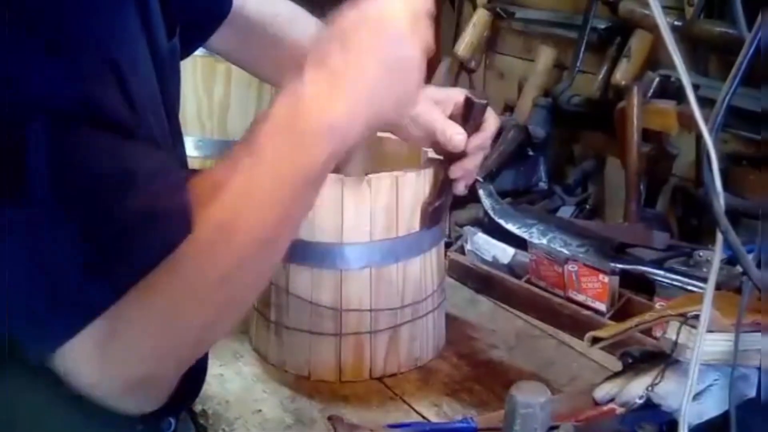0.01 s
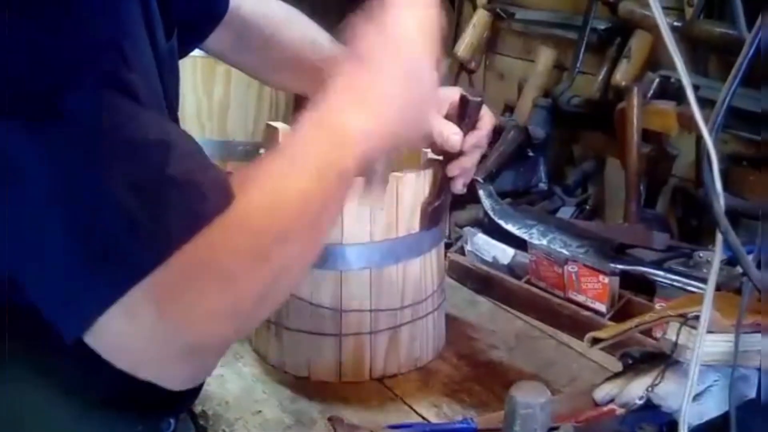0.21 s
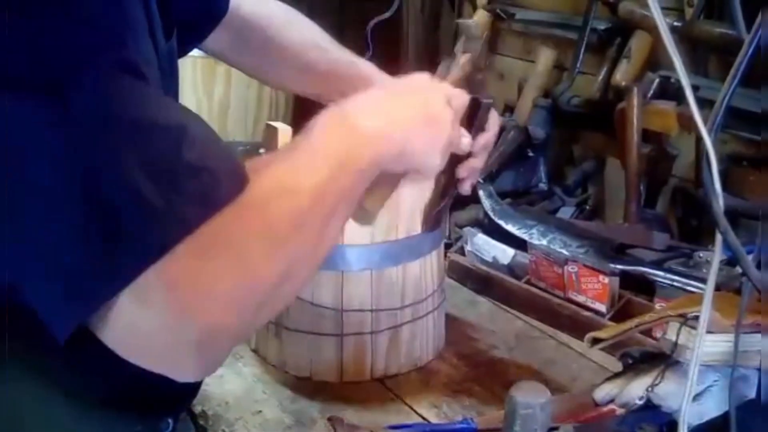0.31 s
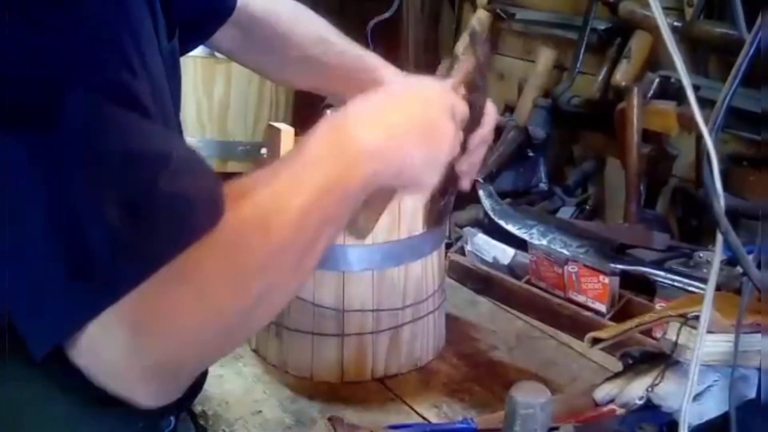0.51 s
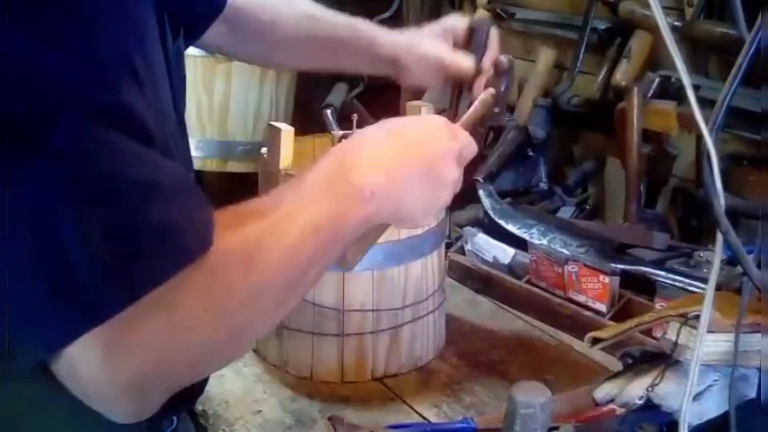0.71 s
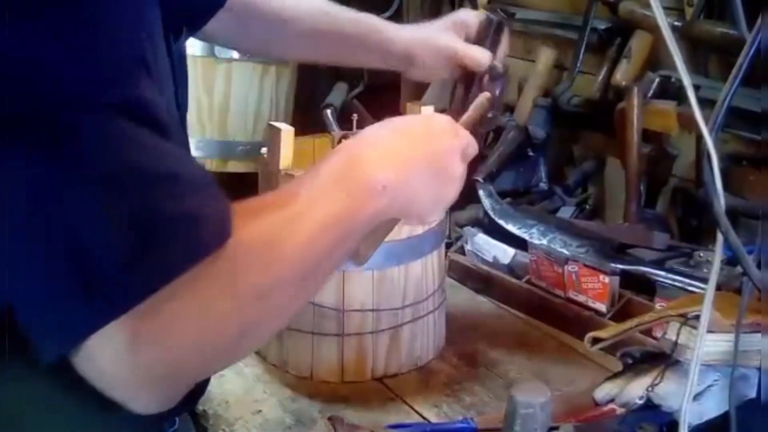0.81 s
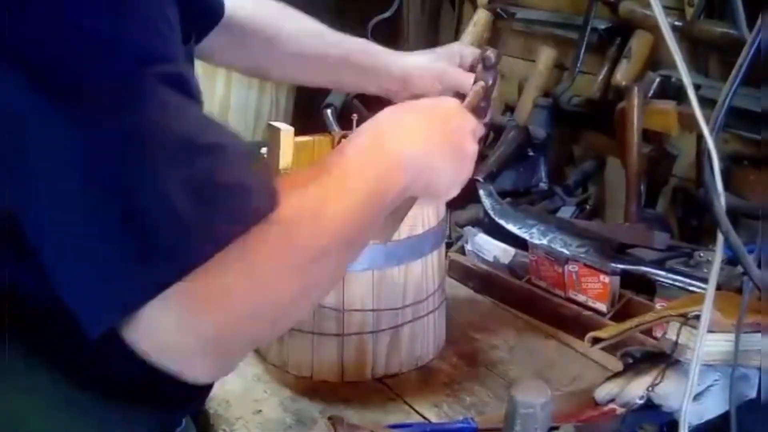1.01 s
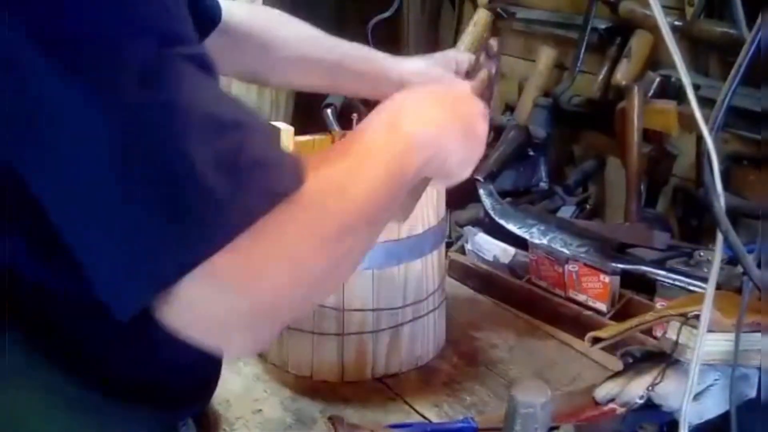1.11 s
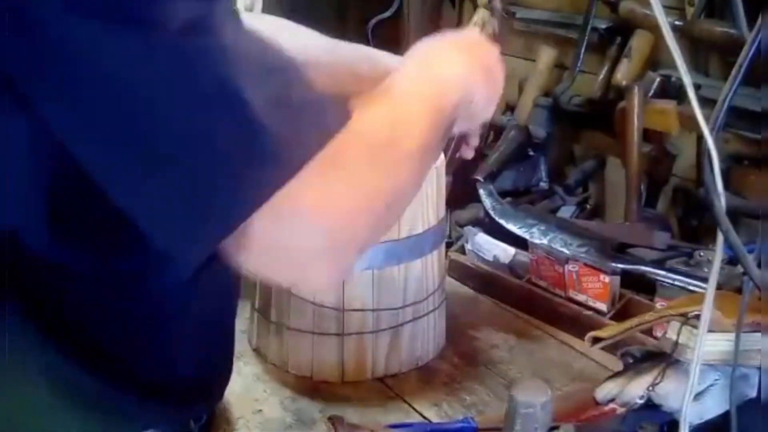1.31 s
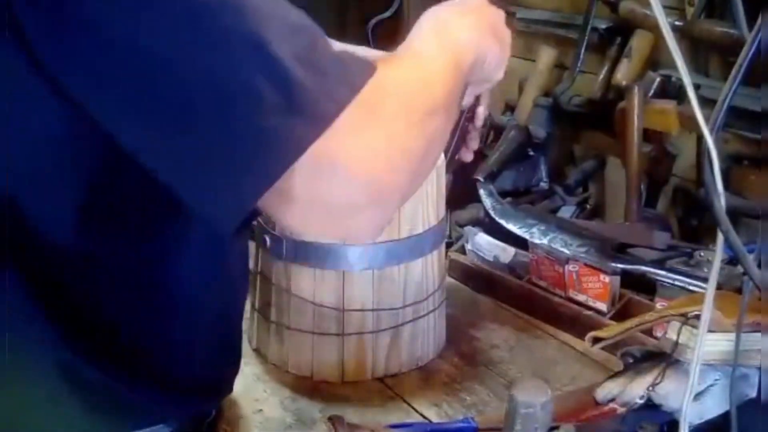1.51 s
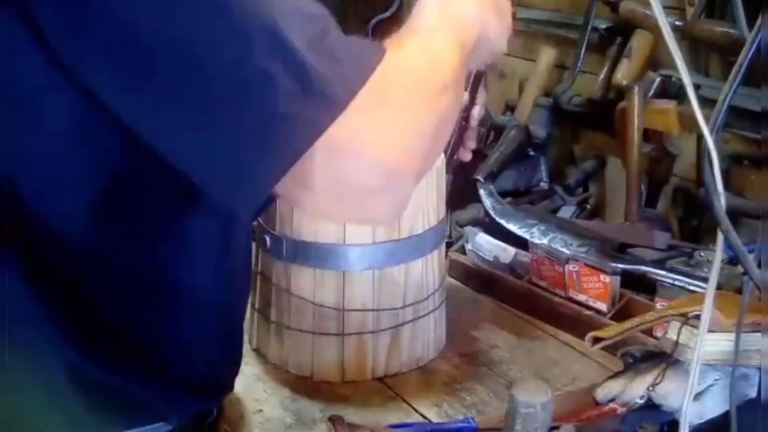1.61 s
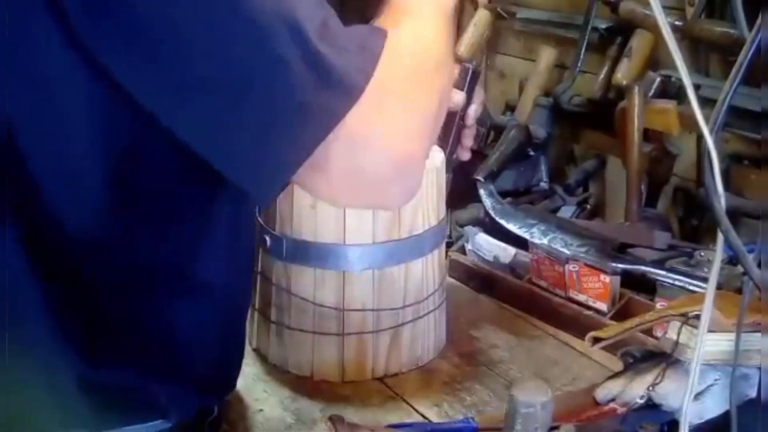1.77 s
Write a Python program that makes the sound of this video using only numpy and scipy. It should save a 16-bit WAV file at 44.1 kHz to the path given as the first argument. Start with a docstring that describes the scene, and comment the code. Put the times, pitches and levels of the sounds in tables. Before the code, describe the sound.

One hard hammer blow on a steel driver cracks loudly against a wooden bucket, with lighter knocks after

```python
"""Driving a hoop onto a wooden bucket

A cooper's hard hammer blow sums damped modes of steel driver and bucket with bursts of filtered noise, and
overloads the microphone. Light knocks before and after it, as the bucket is turned and the driver set on the
hoop, are short resonant noise with faint bucket modes. Rubbing is a noise swell and gliding narrow-band squeaks.
Decaying noise gives the small workshop's echoes; wavering sines give a motor hum over quiet coloured noise.
"""
import sys
import numpy as np
from scipy import signal
from scipy.fft import rfft, irfft, next_fast_len
from scipy.io import wavfile
from scipy.ndimage import map_coordinates

SR = 44100
rng = np.random.default_rng(int(sys.argv[2]) if len(sys.argv) > 2 else 0)


def persist_wave(psi):
    """Save psi, clipped to +-1, as 16-bit WAV."""
    counts = np.round(np.clip(psi, -1, 1) * 32767).astype(np.int16)
    wavfile.write(sys.argv[1], SR, np.atleast_2d(counts).T)


N = 79380  # samples, 1.8 s

# Modes of hammer and driver: (f/Hz, relative level/dB, t60/s)
STEEL_MODES = [(2795, -27, .24), (4963, -27, .2), (5400, -12, .14), (7437, -14, .07), (7535, -19, .16),
               (7591, -12, .07), (5440, -17, .06), (5818, -23, .1), (6562, -29, .14), (8742, -36, .16),
               (9286, -35, .17), (10940, -33, .09), (12370, -30, .09)]
# Modes of the bucket with its hoop: (f/Hz, relative level/dB, t60/s)
BUCKET_MODES = [(85, -30.5, .55), (126, -23, .35), (154, -20, .3), (303.2, -26, .25), (359, -25, 0.42),
                (423, -17, 0.1), (578, -28.5, .4), (622.6, -27, .45), (737, -29.5, 0.25),
                (1216, -31.5, 0.54), (1497, -25, .3), (1561, -23, .2), (1787, -24.5, .15)]
# Spectrum of steel meeting steel: (f/Hz, relative level per Hz/dB)
SNAP_SPECTRUM = [(1000, -9.5), (5000, -3.5), (7500, 0.5), (10000, -8.5), (13500, -1)]
# Spectrum of the dense clatter of staves and hoop: (f/Hz, relative level per Hz/dB)
CRACK_SPECTRUM = [(40, -26.5), (130, -14), (220, -13), (400, 2.5), (1200, -2), (2700, -2.5), (4000, -16.5),
                  (5500, -5.5), (7600, -10), (9500, -24), (13000, -27.5)]
# Spectrum of that clatter as the walls return it: (f/Hz, relative level per Hz/dB)
WASH_SPECTRUM = [(35, -28), (60, -18), (125, -2), (220, -10), (350, 0), (1200, -2), (1550, -2.5),
                 (2000, -10), (2700, -4), (3300, -14), (4400, -17), (5100, -12), (5420, -3.5), (5800, -11),
                 (7100, -10), (7550, -2), (8100, -14), (9200, -16), (10800, -27), (12400, -17.5),
                 (14000, -39.5)]
# Light knocks on the bucket: (t/s, level/dB, low edge f/Hz, high edge f/Hz, body resonance f/Hz,
# clack resonance f/Hz, t60/s, metal tick relative level/dB, echo relative level/dB)
KNOCK_EVENTS = [(.056, -43.5, 500, 1599, 960, 1200, .07, -32, -12.5),
                (.633, -26.5, 282.4, 2030, 397, 1920, 0.078, -31, -16),
                (0.9063, -20, 110, 1630, 565, 1333, 0.11, -38, -12.5),
                (1.2133, -28.5, 121, 2400, 335, 1290, 0.055, -23, -14.5)]
# Spectrum of the wooden contact: (f/Hz, relative level per Hz/dB)
KNOCK_SPECTRUM = [(100, 1), (155, 3.5), (210, 4), (350, 2.5), (600, 5), (900, -2.5), (1300, -3), (1800, -5),
                  (2700, -3.5), (3800, -11)]
# Spectrum of the metal tick: (f/Hz, relative level per Hz/dB)
TICK_SPECTRUM = [(2000, -11), (4000, 0), (6500, 7), (7700, -4), (9000, -29), (13000, -17)]
# Spectrum of the driver sliding along the hoop: (f/Hz, relative level per Hz/dB)
RUB_SPECTRUM = [(300, -7), (700, 5.5), (1400, 9.5), (2400, -2), (3800, -18.5), (6000, -23), (7500, -10.5),
                (9000, -41)]
# Faint rubbing squeaks: (start t/s, end t/s, first f/Hz, last f/Hz, level/dB)
SQUEAKS = [(1.11, 1.2, 2330, 2840, -58), (1.51, 1.68, 1570, 1290, -70)]
# Reverberation time of the workshop: (f/Hz, t60/s)
ROOM_T60 = [(80, .7), (300, 0.67), (1200, 0.51), (2700, 0.45), (4500, .38), (7500, 0.3), (12000, 0.16)]
# Lines of the motor hum: (f/Hz, rms level/dB)
HUM_LINES = [(75, -58.5), (156.5, -60), (237, -57.5), (317, -68), (394, -72.5)]
# Spectrum of the workshop background: (f/Hz, relative level per Hz/dB)
AIR_SPECTRUM = [(25, -9), (45, -15), (75, 0), (110, -3), (200, -12.5), (300, -11), (450, -17), (800, -29.5),
                (1400, -31.5), (3000, -40), (8000, -45), (14000, -55.5)]

# The blow: times in s, levels in dB
BLOW_S = .223
SNAP_DB, SNAP_T60_S = -6.5, .017
CRACK_DB, CRACK_T60_S = -5.5, .075
STEEL_DB, BUCKET_DB = 3, 1.5  # gains on the mode levels
WASH_DB, STEEL_ROOM_DB = -14, -14
# The driver seats again: delay, level relative to the crack, corner of the treble loss
REBOUND_DELAY_S, REBOUND_DB, REBOUND_CORNER_HZ = .0385, -13.5, 2940

# The knocks: resonance peaks are relative to the contact spectrum, widths are half-widths
BODY_DB, BODY_WIDTH_HZ = 2, 70
CLACK_DB, CLACK_WIDTH_HZ = 3, 90
KNOCK_RISE_S, KNOCK_RING_DB = .0011, -2.5

# The rubbing: middle, time from the middle to 1/e, level before flutter
RUB_S, RUB_LENGTH_S, RUB_DB = 1.1, .059, -55.5
RUB_FLUTTER_DB, RUB_FLUTTER_PER_S = 1.3, 120
SQUEAK_KNOTS_PER_S = 220  # rate of the random modulation that roughens a squeak

ROOM_BUILD_S = .012
HUM_WAVER, HUM_WAVER_PER_S = .2, 8  # fraction of the line, random knots per second
AIR_DB = -57.5
CLIP_TOP, CLIP_HARDNESS = .8, 4  # ceiling in full scale, sharpness of the knee
TOP_HZ = 14000


def amp(db):
    """Level: an amplitude ratio is 10 to the power dB/20."""
    return 10 ** (np.asarray(db) / 20)


def unit(x):
    """Normalisation: division by the root mean square gives rms 1."""
    return x / np.sqrt(np.mean(x ** 2) + 1e-20)


def along(points, hz):
    """Interpolation: (Hz, value) points are joined linearly on a logarithmic frequency axis."""
    f, value = np.transpose(points)
    return np.interp(np.log(hz + 1), np.log(f + 1), value)


def filtered(x, response):
    """Linear filtering: the spectrum of x is multiplied by a response of frequency."""
    m = next_fast_len(N + SR // 2)  # padding keeps the filter's tail from wrapping round
    spectrum = rfft(x, m) * response(np.fft.rfftfreq(m, 1 / SR))
    return irfft(spectrum, m)[:N]


def noise(spectrum, shape=lambda hz: 1):
    """Coloured noise: white noise filtered to a given spectrum and scaled to rms 1."""
    white = rng.standard_normal(N)
    return unit(filtered(white, lambda hz: amp(along(spectrum, hz)) * shape(hz)))


def wobble(rate):
    """Slow random modulation: a smooth curve runs through random knots, rate of them per second."""
    knots = rng.standard_normal(N // 8)
    return map_coordinates(knots, [np.arange(N) * rate / SR], mode="wrap")


def since(s):
    """Elapsed time: seconds since s, zero before it."""
    return np.maximum(np.arange(N) / SR - s, 0)


def fall(t, t60, rise):
    """Exponential decay: a quick rise precedes a loss of 60 dB in t60."""
    decay = np.exp(-np.log(1000) * t / t60)
    return decay * (1 - np.exp(-t / rise))


def ring(modes, t, rise):
    """Modal superposition: an impact sets damped sinusoids going together in random phase."""
    out = np.zeros(N)
    phases = rng.uniform(0, 2 * np.pi, len(modes))
    for (hz, db, t60), phase in zip(modes, phases):
        out += amp(db) * fall(t, t60, rise) * np.sin(2 * np.pi * hz * t + phase)
    return out


def echoes(x, s):
    """Diffuse reverberation: steady noise from time s builds up, then decays at each frequency's own t60."""
    hz, t, bands = signal.stft(x, SR, nperseg=256)
    t60 = along(ROOM_T60, hz)[:, None]
    decay = fall(np.maximum(t - s, 0), t60, ROOM_BUILD_S)
    return signal.istft(bands * decay, SR, nperseg=256)[1][:N] * (since(s) > 0)


def room(x):
    """Convolution: the workshop answers x with a noise-like impulse response of unit energy."""
    tail = echoes(rng.standard_normal(N), 0)
    return signal.fftconvolve(x, tail / np.linalg.norm(tail))[:N]


def blow():
    """Impact excitation: short noise bursts start with the modes of steel and wood, and the walls answer."""
    t = since(BLOW_S)
    snap = amp(SNAP_DB) * noise(SNAP_SPECTRUM) * fall(t, SNAP_T60_S, rise=.00027)
    crack = amp(CRACK_DB) * noise(CRACK_SPECTRUM) * fall(t, CRACK_T60_S, rise=.001)
    dull = noise(CRACK_SPECTRUM, lambda hz: 1 / np.hypot(1, hz / REBOUND_CORNER_HZ))
    rebound_fall = fall(since(BLOW_S + REBOUND_DELAY_S), t60=.14, rise=.001)
    rebound = amp(CRACK_DB + REBOUND_DB) * dull * rebound_fall
    steel = amp(STEEL_DB) * ring(STEEL_MODES, t, rise=.0008)
    bucket = amp(BUCKET_DB) * ring(BUCKET_MODES, t, rise=.0024)
    wash = amp(WASH_DB) * echoes(noise(WASH_SPECTRUM), BLOW_S)
    steel_echo = amp(STEEL_ROOM_DB) * room(steel)
    return snap + crack + rebound + steel + bucket + wash + steel_echo


def knocks():
    """Soft contact: band-limited noise excites two wood resonances and the bucket's modes, with a metal tick."""
    out = np.zeros(N)
    for s, db, low_hz, high_hz, body_hz, clack_hz, t60, tick_db, room_db in KNOCK_EVENTS:
        t = since(s)

        def contact(hz):
            """Band-pass response: both ends of the spectrum roll off beyond the contact's edges."""
            low_cut = 1 + (low_hz / (hz + 1)) ** 6
            high_cut = 1 + (hz / high_hz) ** 8
            return 1 / np.sqrt(low_cut * high_cut)

        def wood(hz):
            """Resonance: two peaks, body and clack, stand on the contact's response."""
            body = amp(BODY_DB) / (1 + ((hz - body_hz) / BODY_WIDTH_HZ) ** 2)
            clack = amp(CLACK_DB) / (1 + ((hz - clack_hz) / CLACK_WIDTH_HZ) ** 2)
            return contact(hz) * (1 + body + clack)

        def knock(shape):
            """Superposition: wooden contact noise plus the metal tick."""
            return noise(KNOCK_SPECTRUM, shape) + amp(tick_db) * noise(TICK_SPECTRUM)

        thud = knock(wood) * fall(t, t60, KNOCK_RISE_S)
        modes = amp(KNOCK_RING_DB) * filtered(ring(BUCKET_MODES, t, rise=.00059), contact)
        echo = amp(room_db) * echoes(knock(contact), s)
        out += amp(db) * (thud + modes + echo)
    return out


def rub():
    """Sliding friction: coloured noise swells and fades with a Gaussian envelope and a fast level flutter."""
    swell = np.exp(-((since(0) - RUB_S) / RUB_LENGTH_S) ** 2)
    flutter = amp(RUB_FLUTTER_DB * wobble(RUB_FLUTTER_PER_S))
    return amp(RUB_DB) * noise(RUB_SPECTRUM) * swell * flutter


def scrape():
    """Frictional squeak: random modulation of a gliding carrier gives a rough, narrow-band tone."""
    out = np.zeros(N)
    for start, end, first_hz, last_hz, db in SQUEAKS:
        progress = np.clip(since(start) / (end - start), 0, 1)
        glide_hz = first_hz + (last_hz - first_hz) * progress
        phase = 2 * np.pi * np.cumsum(glide_hz) / SR
        in_phase = wobble(SQUEAK_KNOTS_PER_S) * np.sin(phase)
        quadrature = wobble(SQUEAK_KNOTS_PER_S) * np.cos(phase)
        swell = np.abs(np.sin(np.pi * progress ** 2.5)) ** .5  # fullest about three quarters through
        out += amp(db) * unit(in_phase + quadrature) * swell
    return out


def motor_hum():
    """Modulated line spectrum: each sine wavers at random in amplitude and phase."""
    out = np.zeros(N)
    for hz, db in HUM_LINES:
        phase = 2 * np.pi * hz * since(0)
        waver = wobble(HUM_WAVER_PER_S) * np.cos(phase) + wobble(HUM_WAVER_PER_S) * np.sin(phase)
        out += amp(db) * unit(np.sin(phase) + HUM_WAVER * waver)
    return out


def air():
    """Stationary background: steady coloured noise fills the workshop."""
    return amp(AIR_DB) * noise(AIR_SPECTRUM)


def scene():
    """Superposition: the pressures of all sources add at the microphone."""
    return (blow() + knocks() + rub() + scrape() + motor_hum() + air())[None]


def record(dry):
    """Saturation and band limit: peaks bend towards a ceiling, then a steep low-pass removes the top."""
    overload = np.abs(dry[0] / CLIP_TOP) ** CLIP_HARDNESS
    x = dry[0] / (1 + overload) ** (1 / CLIP_HARDNESS)
    return filtered(x, lambda hz: 1 / np.hypot(1, (hz / TOP_HZ) ** 70))[None]


dry = scene()
out = record(dry)
persist_wave(out)
```